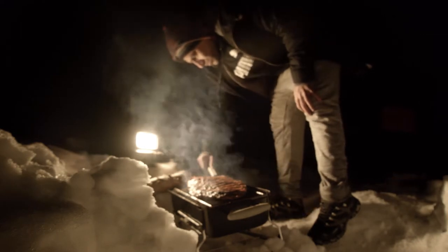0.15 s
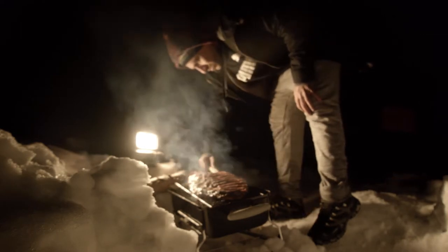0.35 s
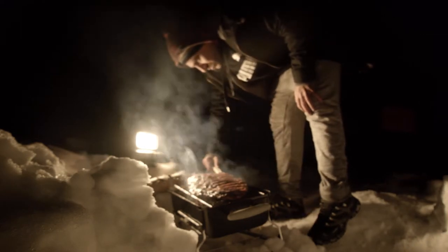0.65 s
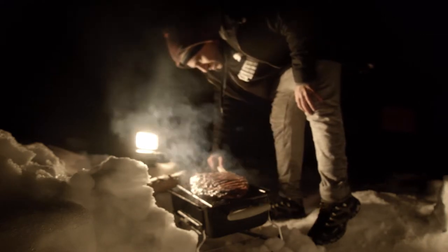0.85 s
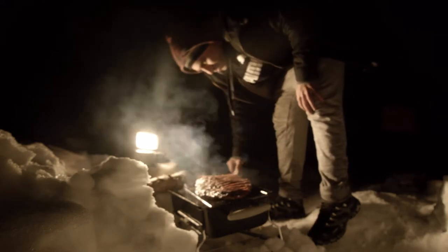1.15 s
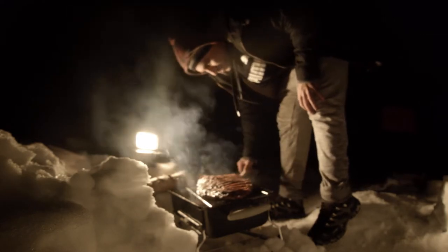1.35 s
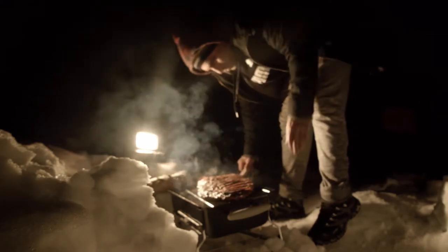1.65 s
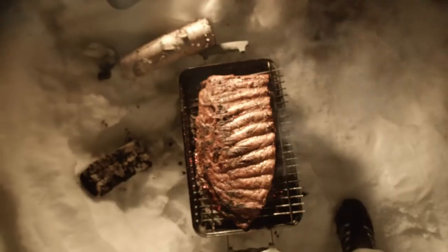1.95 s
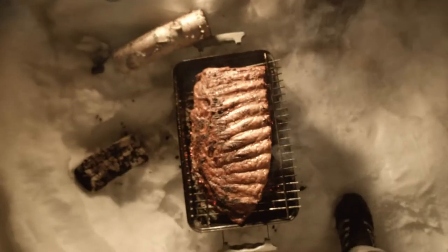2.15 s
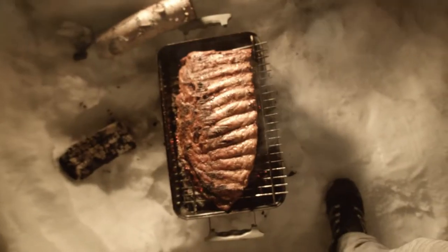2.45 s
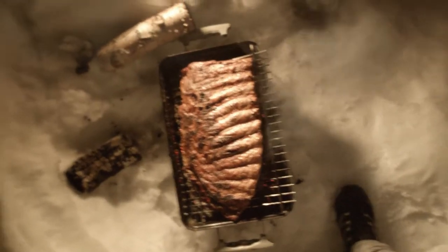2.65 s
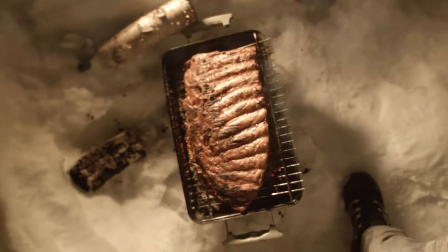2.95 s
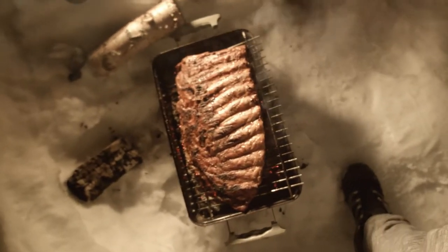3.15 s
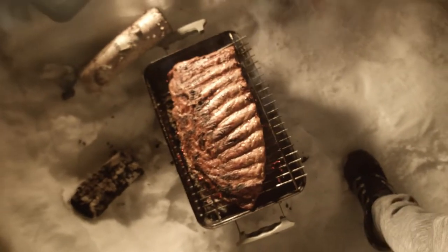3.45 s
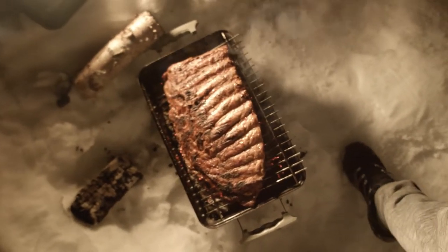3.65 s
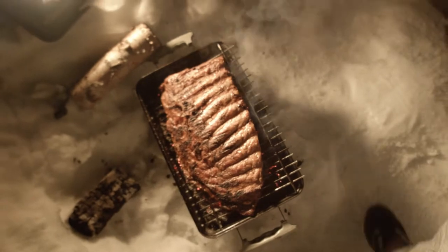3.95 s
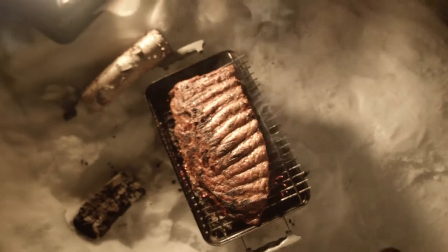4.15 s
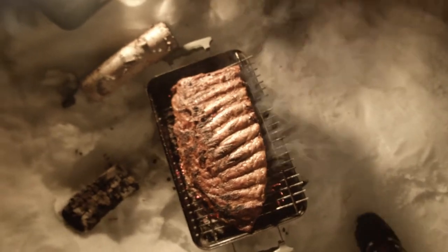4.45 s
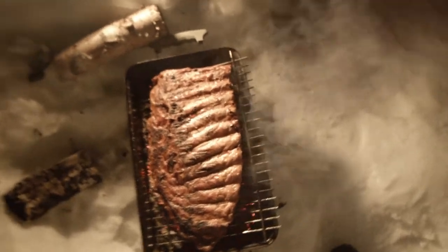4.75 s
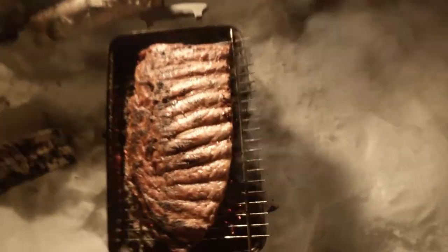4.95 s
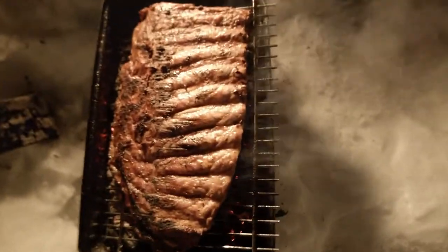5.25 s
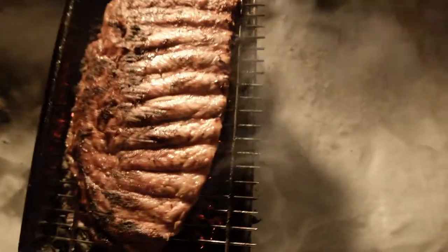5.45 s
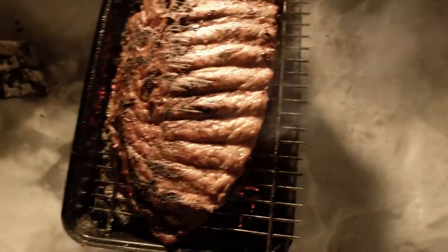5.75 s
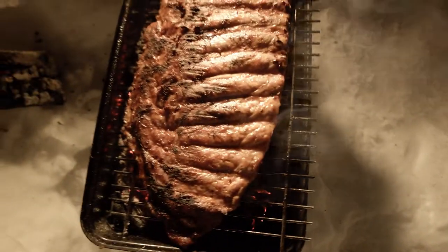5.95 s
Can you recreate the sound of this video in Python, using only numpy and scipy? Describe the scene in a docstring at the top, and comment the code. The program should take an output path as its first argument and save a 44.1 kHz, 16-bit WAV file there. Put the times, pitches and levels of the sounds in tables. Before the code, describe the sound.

A tool clinks on a wire grate over faint sizzling, then ribs hiss and crackle up close while boots crunch in snow.

```python
"""Ribs on a grill in the snow

Ribs sizzle over charcoal, heard first from a few steps off, then from right above. Steam hisses out in
countless tiny bursts, fat spits, something ticks, a tool knocks and scrapes the wire grate, and boots
crunch the snow. A faint hum comes and goes; close up, slow air pulses rock the microphone."""
import sys
import numpy as np
from scipy import signal
from scipy.fft import rfft, irfft, next_fast_len
from scipy.io import wavfile
from scipy.ndimage import uniform_filter1d

SR = 44100
rng = np.random.default_rng(int(sys.argv[2]) if len(sys.argv) > 2 else 0)


def master(y):
    """Save y as 16-bit WAV."""
    cut = np.clip(np.atleast_2d(y).T, -1, 1)
    pcm = np.round(cut * 32767)  # scale
    wavfile.write(sys.argv[1], SR, pcm.astype(np.int16))


N = 269451
T = np.arange(N) / SR
CHANGE_S = 1.962  # the scene changes: from here on the grill is heard close up
NEAR = T > CHANGE_S
BENT = np.clip((T - 4.4) / 1.1, 0, 1)  # 0 standing upright, 1 bent over the meat
FAR_DB = -66  # level of the hiss from a few steps off


# The hiss close up, growing as the listener bends down: (time [s], level [dB])
NEAR_HISS = [(1.96, -57), (2.15, -57.5), (2.35, -58), (2.8, -57), (3.15, -56), (3.75, -56.5), (4.2, -58.5),
             (4.9, -55.5), (5.15, -55), (5.19, -54), (5.3, -52.5), (5.5, -54), (5.68, -51.5), (5.77, -50),
             (5.87, -52), (5.98, -51.5), (6.02, -53), (6.11, -51.5)]
def sizzle():
    """Steam hisses out of the meat; each range of pitch flickers on its own."""
    low, body, fry, top, edge, thin, rim = split(steam(), edges_hz=(300, 1600, 6000, 8600, 10100, 14300))
    treble = top + edge + thin + rim
    treble_size = np.where(NEAR, treble[NEAR].std(), treble[~NEAR].std())
    flare_db = flares()
    level_db = np.where(NEAR, curve(NEAR_HISS) + flare_db, FAR_DB)
    average_db = np.where(NEAR, level_db[NEAR].mean(), FAR_DB)
    swing_db = level_db - average_db
    # The lows are open air around the grill; only the body partly follows the steam.
    low = undb(average_db - 2 - 0.5 * BENT + 2 * flicker(12)) * low
    body = undb(average_db - 2 + 0.68 * swing_db + 1.1 * flicker(21.1)) * body
    fry_db = np.where(NEAR, 0.1 * BENT - 0.21 * flare_db + 0.16 * swing_db, 0.5)
    fry = undb(fry_db + 0.56 * flicker(24.24)) * fry
    # Bending down sharpens the peak of the hiss and dulls what lies above; flares brighten it.
    top = top + 0.28 * BENT * resonate(top, 8050, 550)
    edge = undb(0.91 * flare_db - 0.5 * BENT) * edge
    rim = undb(NEAR * (-4 + 0.7 * flare_db - 2 * BENT)) * rim
    bright = undb(0.8 * flicker(30)) * (top + edge)
    highest = undb(0.23 * flare_db - BENT + 0.58 * flicker(30)) * (thin + rim)
    hiss = (fry + bright + highest) / treble_size + steam_jet(flare_db)
    surge_db = 0.27 * flicker(40) - 0.75 * flicker(14)
    return (low + body) / treble_size + undb(level_db + surge_db) * hiss


# The tone of the steam from a few steps off, and from close up: (pitch [Hz], level [dB])
FAR_TONE = [(12, -59), (20, 1.5), (146, -5.5), (320, -11.5), (500, -9.5), (920, -14), (1900, -17.5),
            (2400, -20), (4000, -18), (6000, -20), (8300, -12.5), (10400, -21), (13400, -19),
            (16000, -22.5)]
NEAR_TONE = [(35, -29), (60, 0), (153, -4), (315, -7), (417, 0.5), (579, -5), (698, -1.5), (1410, -2.5),
             (1860, -4.5), (2770, -3), (6430, -6.5), (7940, -0.5), (10500, -10.5), (13600, -3),
             (16000, -7.5)]
def steam():
    """Escaping steam is smooth noise; bursting bubbles add tiny clicks."""
    rush = rng.standard_normal(N)
    bubbles = undb(np.where(NEAR, -3.5, -4.5)) * clicks(N, per_s=1300, spread_db=2.5)
    bursts, change = rush + bubbles, int(CHANGE_S * SR) + 1
    return np.concatenate([shape_tone(bursts[:change], FAR_TONE), shape_tone(bursts[change:], NEAR_TONE)])


# Fat dripping on the coals: (time [s], length [s], boost [dB])
FAT_DRIPS = [(3.16, 0.46, 3), (4.25, 0.38, 1.5)]
def flares(sag_db_per_s=0.5):
    """The boost in dB as a drip makes the hiss flare, strongest at its start."""
    return sum((db - sag_db_per_s * (T - s)) * swell(s, length, rise_s=0.012, fall_s=0.1)
               for s, length, db in FAT_DRIPS)


# The tones of the steam jet: (multiple of the jet's pitch, width [Hz], level [dB])
JET_TONES = [(.49, 307, -2), (1, 320, -1.5), (1.29, 220, -13.5), (1.78, 403, -4.5)]
def steam_jet(flare_db):
    """A jet of steam whistles softly, lower and fainter as the listener bends down."""
    hz = np.where(NEAR, 2790 - 564 * BENT, 1900)
    level_db = np.where(NEAR, -16 - 11 * BENT + 0.99 * flare_db, -31) + 0.83 * flicker(6.1)
    return undb(level_db) * sum(undb(db) * whistle(k * hz, width) for k, width, db in JET_TONES)


# The loudest spits of fat: (time [s], level [dB], pitch [Hz], spray compared with the ring [dB])
LOUD_SPITS = [(0.5757, -46, 8600, -9), (0.6265, -50, 8580, -9), (0.8804, -49, 7400, -9),
              (1.955, -41, 8400, -8), (2.0193, -38, 13500, -6), (2.3122, -43, 7500, -12),
              (2.596, -36, 8100, 2), (2.74, -42.5, 7600, -15), (2.809, -41, 13900, -7),
              (2.819, -39, 7600, -1), (2.838, -43, 7760, -12), (2.897, -42, 8320, -8),
              (2.9555, -43, 7740, -12), (3.0035, -41, 13200, -7), (3.1275, -46, 4900, 3),
              (3.1755, -42, 13000, -9), (3.1904, -40, 8700, -12), (3.2025, -39, 2870, 2),
              (3.291, -44, 8200, -9), (3.3335, -39, 14500, -9), (3.3512, -44, 5000, 7),
              (3.4366, -36, 8350, 8), (3.8595, -52, 12100, -15), (4.356, -35.5, 7900, -15),
              (4.6288, -37, 2500, -14), (4.6452, -40, 2840, 3), (4.8803, -42, 14000, -9),
              (5.02, -41, 5000, -9), (5.1424, -41, 7880, -2), (5.1597, -43, 3160, 2),
              (5.2152, -33, 8200, -14), (5.2562, -31.5, 7000, 3), (5.3654, -33, 7500, -4),
              (5.433, -37, 7440, -5), (5.452, -40, 4600, -1), (5.483, -39, 13100, -9),
              (5.6095, -41, 7860, -9), (5.66, -43, 7200, -9), (5.772, -42, 4000, -12),
              (5.79, -45, 3700, -12), (5.832, -50, 13800, -13), (5.971, -43, 3800, -12),
              (6.055, -35, 5800, 2), (6.057, -43, 4000, -12)]
def spits():
    """A droplet bursts: a sharp snap, a short ring and a thin, high spray."""
    out, t = np.zeros(N), T[:400]
    for s, db, hz, spray_db in list(LOUD_SPITS) + small_spits():
        snap = (t == 0) + 0.31 * rng.standard_normal(len(t)) * np.exp(-t / 0.00094)
        ring = resonate(resonate(snap, hz, 0.2 * hz), hz, 0.63 * hz)
        spray = resonate(resonate(snap, 14200, 6000), 15700, 8000)
        pop = unit_peak(ring) + undb(spray_db) * unit_peak(spray) + 0.37 * snap
        add(out, s, undb(db) * unit_peak(pop))
    return out


def small_spits(per_s=3.8, above_hiss_db=6, spread_db=7, spray_db=-2):
    """More droplets, listed at random moments; they are louder where the hiss is louder."""
    when, softness, pitch = rng.random((int(per_s * N / SR), 3)).T
    times = when * T[-500]
    hiss_db = np.where(times > CHANGE_S, curve(NEAR_HISS, times), FAR_DB)
    levels = hiss_db + above_hiss_db + spread_db * (1 - 2 * softness)
    pitches = 7900 * 2 ** (pitch - 0.6)
    return [(s, db, hz, spray_db) for s, db, hz in zip(times, levels, pitches)]


# Blows of the tool on the grate: (time [s], level [dB], main pitch [Hz], drop away from it [dB/octave],
# second pitch [Hz], its level [dB], ring time [times the grate's own], contact time [s])
TOOL_BLOWS = [(.058, -56, 500, 14, 700, -8, 0.42, 0.0023), (.172, -52.5, 686, 53, 503, -4, 0.75, 0.0064),
              (.292, -51, 810, 24, 450, -7, 0.52, 0.0043), (.369, -46, 1810, 52, 543, -6.5, 1, 0.0019),
              (.371, -50, 8250, 16, 13500, -4, .5, 0.0015), (.372, -51, 940, 26, 3480, -4, 0.64, 0.0041),
              (.755, -66, 1880, 38, 1980, -4, 1.1, 0.013), (0.808, -69.5, 1120, 50, 1134, -9, 0.92, 0.019),
              (1.014, -45.5, 606, 44, 1120, -4, 0.38, 0.0024), (1.015, -54, 3270, 27, 4700, -3, .3, 0.0012),
              (1.034, -51, 570, 36, 1110, -23, 0.64, 0.0045),
              (1.074, -49.5, 650, 2, 2300, -3, 0.58, 0.0051), (1.116, -55, 690, 39, 500, -13, 0.3, 0.0043),
              (1.206, -51.5, 690, 11, 1410, -3, 0.32, 0.0045), (1.26, -59.5, 1417, 14, 2290, -3, .6, 0.017),
              (1.468, -59, 700, 10, 500, -6, 0.28, 0.0018), (1.587, -56, 1000, 15, 1400, -3, 0.3, 0.0018),
              (1.594, -49.5, 780, 19, 2500, -9, 0.31, 0.00098),
              (1.68, -33, 1400, 8, 6100, -5, 0.86, 0.0067), (1.707, -39, 1060, 9, 3700, -9, 0.33, 0.0032),
              (1.716, -39.5, 590, 39, 415, -7, 0.5, 0.014), (1.846, -49.5, 900, 6, 2700, -9, 0.54, 0.0058),
              (1.874, -35, 495, 24, 3500, -0.5, 0.28, 0.0047),
              (1.941, -48.5, 2170, 17, 3700, -6, 0.24, 0.0022),
              (1.964, -44, 1200, 18, 497, -14, 0.13, 0.0023)]
# The rattle of loose wires and pan: (pitch [Hz], level [dB], fade time [contact times])
LOOSE_PARTS = [(190, -9.5, 6.9), (900, 4, 3.25), (2500, 8, 0.88), (7000, -6, 0.8), (12500, -14, 0.7)]
def knocks(chatter=0.5):
    """Each blow is a short, chattering push that rings the grate and rattles its loose parts."""
    out, t = np.zeros(N), T[:SR // 3]
    for s, db, hz, drop_db, second_hz, second_db, ring, contact_s in TOOL_BLOWS:
        onset = 1 - np.exp(-t / (0.48 * contact_s))
        roughness = unit_level(uniform_filter1d(rng.standard_normal(len(t)), size=40))
        push = (1 + chatter * roughness) * onset * np.exp(-t / contact_s)
        wires = grate(push, hz, drop_db, ring, second_hz, second_db, struck=True)
        wires /= wires[:int(3 * contact_s * SR) + 100].std()  # the first moments set the loudness
        shake, rattle = rng.standard_normal(len(t)), 0
        for part_hz, part_db, fade in LOOSE_PARTS:
            part = resonate(resonate(shake, part_hz, 1.75 * part_hz), part_hz, 1.75 * part_hz)
            rattle += undb(part_db) * unit_level(part) * np.exp(-t / (contact_s * fade))
        rattle_db = -0.5 - 0.1969 * drop_db  # a blow with a narrow range of pitch shakes less loose
        add(out, s, undb(db - 8.5) * (wires + undb(rattle_db) * onset * rattle))
    return out


# The notes of the wire grate: (pitch [Hz], level [dB], time to fade by 60 dB [s])
GRATE_NOTES = [(334, 0, 0.081), (408, -0.5, 0.12), (497, 2.5, 0.093), (590.6, -5.5, 0.2),
               (686, -2.5, 0.095), (783, -11, 0.12), (865, -13, 0.14), (954, -12, 0.19), (1121, -8, 0.16),
               (1308, -6.5, 0.079), (1428, -2.5, 0.13), (1905, 0.5, 0.039), (2045, -8.5, 0.17),
               (2310, -3, 0.096), (2640, -8, 0.1), (2957, -5.5, 0.1), (3200, -1, 0.048), (3710, -5, 0.059),
               (4090, 0.5, 0.034), (4750, 0, 0.054), (5340, -20, .05), (5800, -5, 0.041),
               (6400, 1.5, 0.026), (6650, -6, 0.033), (7200, 4, 0.018), (8255, 3.5, 0.026),
               (9010, 8, 0.007), (10090, 10, 0.0075), (11200, 9, 0.006), (12350, 13, 0.008),
               (13400, 14, 0.007), (15000, 11, 0.005)]
def grate(push, main_hz, drop_db, ring, second_hz, second_db, struck=False):
    """Pushed wires ring; the notes near the two given pitches answer most."""
    out = 0
    for hz, db, fade_s in GRATE_NOTES:
        phase, luck = rng.random(2)
        from_main_db = -drop_db * abs(np.log2(hz / main_hz))
        from_second_db = second_db - drop_db * abs(np.log2(hz / second_hz))
        note_db = db + max(from_main_db, from_second_db) + 6 * (luck - 0.5)  # no two pushes are alike
        # A blow drives each note at its own pitch.
        drive = push * np.cos(2 * np.pi * (hz * T[:len(push)] + phase)) if struck else push
        ring_s = fade_s * ring
        out += undb(note_db) * ring_s * resonate(drive, hz, np.log(1000) / (np.pi * ring_s))
    return out


# Dry ticks close by: (time [s], level [dB], ring time [times the body's own])
DRY_TICKS = [(2.177, -33.5, 1), (2.727, -41, 0.55), (3.617, -45, .6)]
# The notes of the thing that ticks: (pitch [Hz], level [dB], time to fade by 60 dB [s])
TICK_NOTES = [(590, 3.5, 0.014), (1000, -6, 0.017), (1435, 5, 0.012), (1930, -20, 0.012), (2300, -3, 0.018),
              (3030, -17, 0.011), (4600, -17, 0.011)]
def ticks(rise_s=0.00066, crack_db=-3, crack_s=0.0022):
    """A small hollow body snaps and falls silent almost at once."""
    out, t = np.zeros(N), T[:SR // 20]
    for s, db, ring in DRY_TICKS:
        body = sum(undb(note_db - 60 * t / (fade_s * ring)) * np.sin(2 * np.pi * (hz * t + rng.random()))
                   for hz, note_db, fade_s in TICK_NOTES)
        crack = unit_level(resonate(rng.standard_normal(len(t)), 1500, 3000)) * np.exp(-t / crack_s)
        snap = (body + undb(crack_db) * crack) * (1 - np.exp(-t / rise_s))
        add(out, s, undb(db) * unit_peak(snap))
    return out


# The tool dragging over the grate: (time [s], length [s], level [dB])
TOOL_DRAGS = [(0, 0.11, -70), (0.244, 0.14, -64.5), (0.367, 0.21, -72), (1.012, 0.18, -64.5),
              (1.185, 0.22, -62.5), (1.724, 0.14, -63.5), (1.821, 0.2, -55)]
def scrapes(grit_db=-14):
    """The tool sticks and slips, ringing the grate and grinding on its crust."""
    slips = clicks(N, per_s=2500, spread_db=1)
    wires = unit_level(grate(slips, main_hz=580, drop_db=8.2, ring=0.54, second_hz=680, second_db=-5.5))
    grit = unit_level(resonate(slips, 1160, 1600))
    pressure = sum(undb(db) * swell(s, length, rise_s=0.047, fall_s=0.088)
                   for s, length, db in TOOL_DRAGS)
    return pressure * (wires + undb(grit_db) * grit)


# Snow giving way under a boot:
# (time [s], level [dB], pitch [Hz], rise time [s], crisp top compared with the middle [dB])
BOOT_CRUNCHES = [(2.23, -59, 300, 0.0051, 2), (2.307, -51, 1407, 0.009, 1), (2.558, -47, 1390, 0.0042, -27),
                 (3.751, -45.5, 1850, 0.019, -4), (4.503, -36.5, 1580, 0.0081, -2.5),
                 (4.529, -43, 1120, 0.046, -27), (4.565, -41, 1500, 0.023, -23),
                 (4.609, -38, 1660, 0.013, -18), (4.641, -38.5, 1560, 0.01, -16),
                 (4.665, -52, 1800, 0.017, -16), (4.722, -44, 1270, 0.02, -6), (4.742, -39, 800, 0.003, -7),
                 (5.02, -44, 1500, 0.034, 1), (5.066, -36, 855, 0.0036, -3), (5.079, -43, 1480, 0.017, -3),
                 (5.116, -41.5, 1480, 0.014, 2), (5.137, -45, 1700, 0.0044, -2),
                 (5.222, -40, 780, 0.0094, 5.5), (5.24, -42, 2560, 0.014, -8),
                 (5.285, -37, 2000, 0.015, -6), (5.304, -37, 1900, 0.0097, -8),
                 (5.318, -36, 1500, 0.0062, -1), (5.356, -42, 2990, 0.0094, -10),
                 (5.385, -34.5, 2000, 0.0026, -16)]
def crunches():
    """Snow crystals break in a quick swell of tiny cracks."""
    out, t = np.zeros(N), T[:SR // 4]
    for s, db, hz, rise_s, crisp_db in BOOT_CRUNCHES:
        cracks = clicks(len(t), per_s=9000, spread_db=3.5)
        middle = unit_level(resonate(resonate(cracks, hz, 1.87 * hz), hz, 2.6 * hz))
        crisp = unit_level(resonate(resonate(cracks, 5300, 9400), 5400, 9600))
        low = unit_level(resonate(cracks, 430, 760))
        depth = 1.17 * (900 / hz) ** 0.92  # a higher crunch has less low body
        loudness = (t / rise_s * np.exp(1 - t / rise_s)) ** 0.95
        add(out, s, undb(db - 13.5) * loudness * (middle + undb(crisp_db) * crisp + depth * low))
    return out


# Low groans: (time [s], length [s], first pitch [Hz], last pitch [Hz], width [Hz], level [dB])
LOW_GROANS = [(0.265, 0.064, 200, 183, 70, -67.5), (0.36, 0.07, 190, 170, 70, -72),
              (1.19, 0.22, 190, 180.5, 45, -67), (2.301, 0.144, 195, 142, 129, -63),
              (5.592, .7, 429, 400.7, 159, -72.5)]
def groans():
    """A faint, rough hum sags in pitch."""
    out = np.zeros(N)
    for s, length, from_hz, to_hz, width_hz, db in LOW_GROANS:
        progress = np.clip((T - s) / length, 0, 1)
        hum = whistle(from_hz + (to_hz - from_hz) * progress, width_hz)
        even_hum = hum / np.sqrt(uniform_filter1d(hum ** 2, SR // 20))
        arch = np.sqrt(np.abs(np.sin(np.pi * progress))) * (progress < 1)
        out += undb(db) * arch * even_hum
    return out


# How strongly the air pulses: (time [s], level [dB])
AIR_STRENGTH = [(1.96, -45), (2.5, -36), (2.8, -48), (3.14, -40), (3.74, -50.5), (4.1, -42.5), (4.5, -52.5),
                (4.85, -37), (5.15, -40.5), (5.45, -38.5), (5.65, -42.5), (6.11, -45)]
# The deep tone of the pulses: (pitch [Hz], level [dB])
AIR_TONE = [(3, -20.5), (8, 1), (16, -2), (20, -1.5), (27, -26), (50, -37), (100, -57.5)]
def air_pulses():
    """Close to the grill the air pressure swings, mostly too slowly to hear."""
    swing = shape_tone(rng.standard_normal(N), AIR_TONE)
    power = uniform_filter1d(uniform_filter1d(swing ** 2, SR // 4), SR // 4)
    strength = uniform_filter1d(undb(curve(AIR_STRENGTH)), SR // 10)
    fade_in = np.clip((T - CHANGE_S) / 0.0029, 0, 1)
    return swing / np.sqrt(power) * strength * fade_in


# How much of the close sizzle spreads to the sides: (pitch [Hz], level [dB])
SIDE_TONE = [(60, -14), (500, -20), (1500, -23), (3000, -25.5), (8500, -26.5), (11500, -23), (14000, -21),
             (15500, -17.5)]
def side_hiss(mic_hiss_db=-70.5):
    """Hiss that widens the sound: the microphone's own from afar, the sizzle close up."""
    shift = int(0.03 * SR)  # shifted this far, the sizzle acts like a separate noise
    return lambda frying: np.where(
        NEAR, shape_tone(np.concatenate([frying[shift:], frying[-shift:][::-1]]), SIDE_TONE),
        undb(mic_hiss_db) * rng.standard_normal(N))


def undb(db):
    """Turn decibels into a number to multiply by."""
    return 10 ** (np.asarray(db) / 20)


def unit_level(x):
    """Scale a sound to an average power of 1."""
    return x / np.sqrt(np.mean(x ** 2))


def unit_peak(x):
    """Scale a sound to a peak of 1."""
    return x / np.abs(x).max()


def curve(table, times=T):
    """Join (time, level) points with straight lines."""
    return np.interp(times, *np.transpose(table))


def swell(s, length, rise_s, fall_s):
    """Rise from 0 to 1, hold, and fall back."""
    return np.clip(np.minimum((T - s) / rise_s, (s + length - T) / fall_s), 0, 1)


def add(out, s, x):
    """Mix x into out, starting at s seconds."""
    i = int(s * SR)
    out[i:i + len(x)] += x[:N - i]


def flicker(per_s):
    """A smooth random wobble, about 1 in size, with slow drift taken out."""
    k = int(SR / per_s)
    steps = np.repeat(rng.standard_normal(N // k + 1), k)[:N]
    return 1.3 * uniform_filter1d(uniform_filter1d(steps, k), k) - uniform_filter1d(steps, SR // 3)


def clicks(n, per_s, spread_db):
    """Clicks at random moments; a few are far larger than the rest."""
    when, kick, size = rng.random(n), rng.standard_normal(n), rng.exponential(size=n)
    return unit_level((when < per_s / SR) * kick * undb(spread_db * np.minimum(size, 3.5)) + 1e-9)


def whistle(hz, width_hz):
    """A breathy tone: slow noise carried on a moving pitch."""
    k = int(SR / width_hz)
    slow = uniform_filter1d(uniform_filter1d(rng.standard_normal((2, N)), k), k)
    tone = np.exp(2j * np.pi * np.cumsum(hz) / SR)
    return unit_level(np.real((slow[0] + 1j * slow[1]) * tone))


def resonate(x, hz, width_hz):
    """Let through a band of pitches around hz."""
    return signal.lfilter(*signal.iirpeak(np.clip(hz, 50, .45 * SR), hz / width_hz, fs=SR), x)


def shape_tone(x, table):
    """Turn each pitch up or down, following (pitch, level) points."""
    n = next_fast_len(len(x) + SR)
    hz, db = np.transpose(table)
    log_gain = np.interp(np.log(np.fft.rfftfreq(n, 1 / SR) + 1), np.log(hz), db) * np.log(10) / 20
    # Folding the second half onto the first makes the filter ring after a click, never before.
    folded = irfft(log_gain, n)
    folded[1:n // 2] *= 2
    folded[n // 2 + 1:] = 0
    return irfft(rfft(x, n) * np.exp(rfft(folded)), n)[:len(x)]


def split(x, edges_hz):
    """Cut a sound into ranges of pitch that add back up to the whole."""
    n = next_fast_len(len(x))
    spectrum, octave = rfft(x, n), np.log2(np.fft.rfftfreq(n, 1 / SR) + 1)
    below = [np.clip(.5 - 4 * (octave - np.log2(hz)), 0, 1) for hz in edges_hz]
    return [irfft(spectrum * (b - a), n)[:len(x)] for a, b in zip([0] + below, below + [1])]


def scene():
    """Mix everything in stereo, a little louder on the left."""
    frying = sizzle()
    middle = frying + spits() + knocks() + ticks() + scrapes() + crunches() + groans()
    side = side_hiss()(frying)
    lean = np.array([[0.5], [-0.5]])  # left goes up, right goes down
    grill = np.array([middle + side, middle - side]) * undb(lean * np.where(NEAR, 3.4, 3.45))
    return grill + air_pulses() * undb(lean * 3.7)


def record(dry, top_hz=15740):
    """Cut off the very highest pitches steeply."""
    return signal.sosfilt(signal.ellip(18, .3, 70, top_hz, fs=SR, output="sos"), dry)


dry = scene()
out = record(dry)
master(out)
```